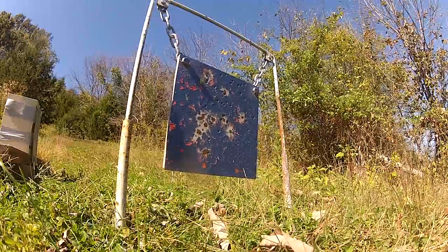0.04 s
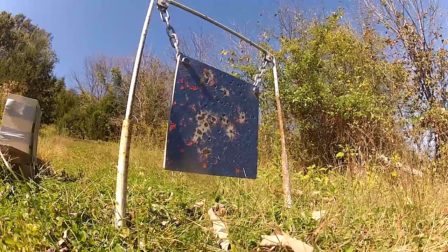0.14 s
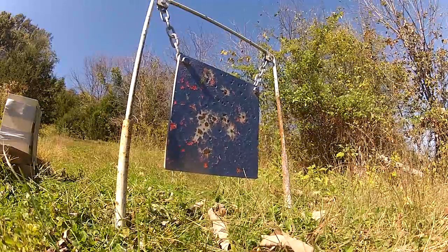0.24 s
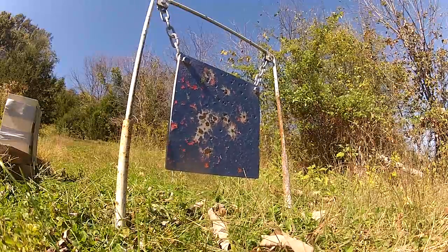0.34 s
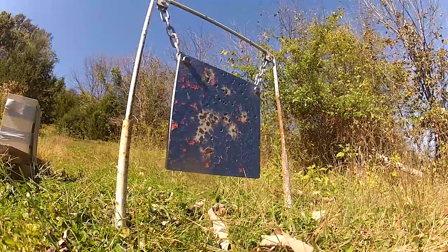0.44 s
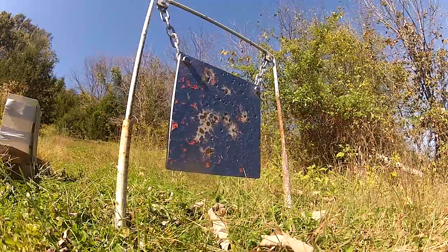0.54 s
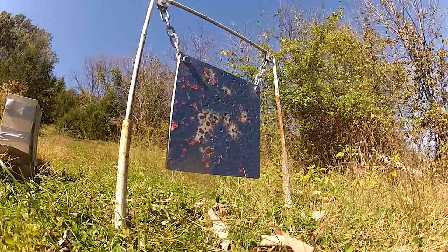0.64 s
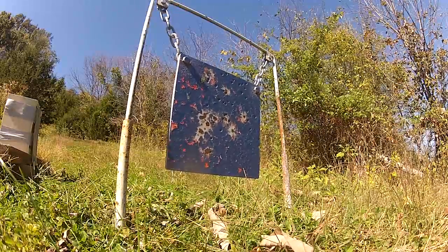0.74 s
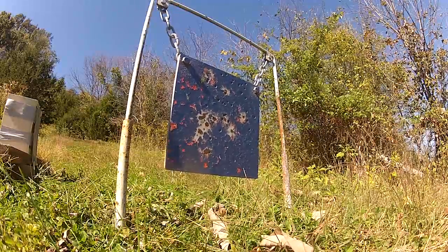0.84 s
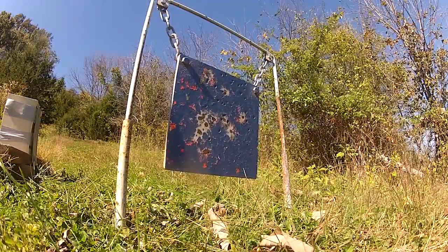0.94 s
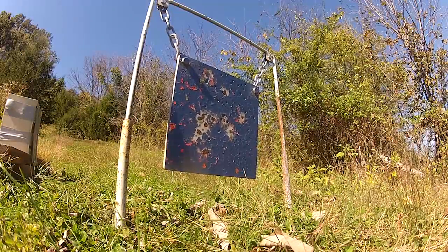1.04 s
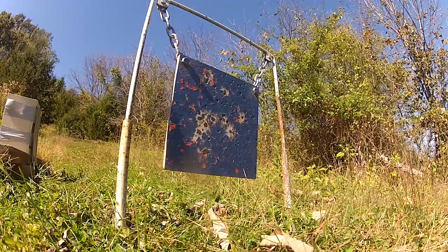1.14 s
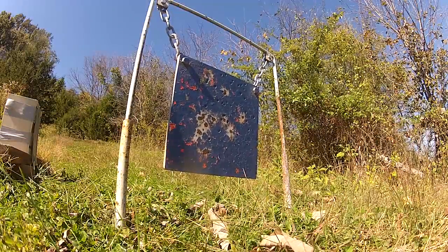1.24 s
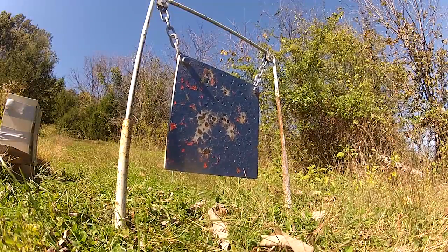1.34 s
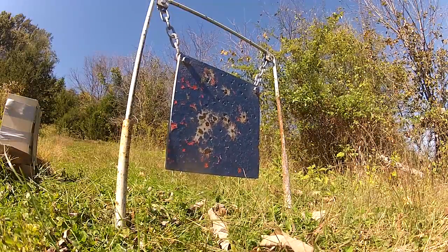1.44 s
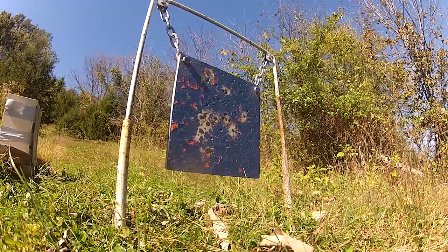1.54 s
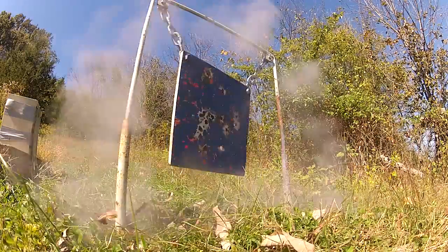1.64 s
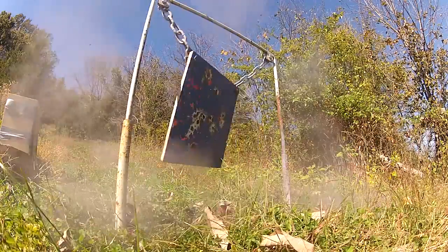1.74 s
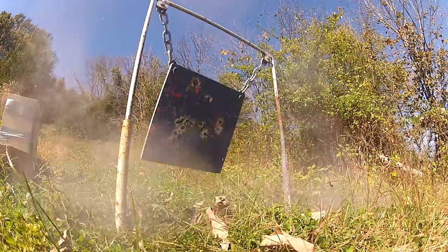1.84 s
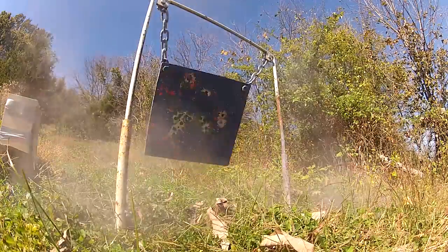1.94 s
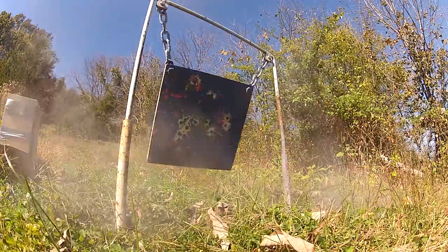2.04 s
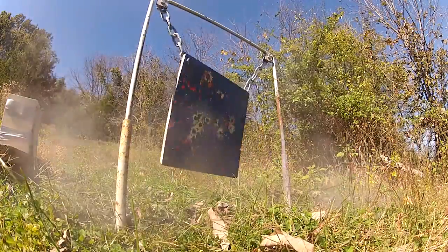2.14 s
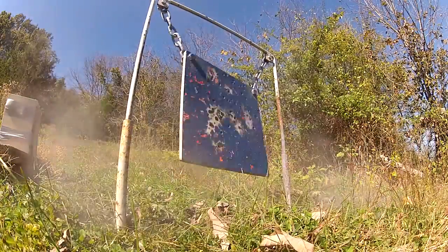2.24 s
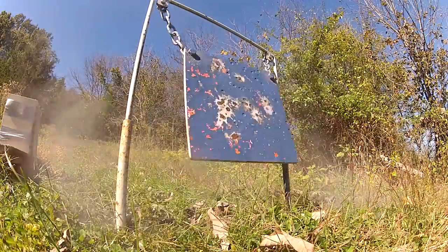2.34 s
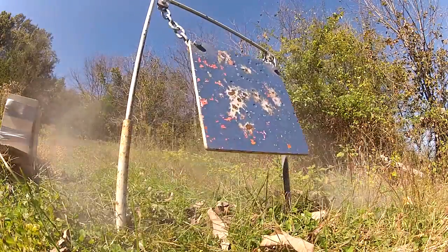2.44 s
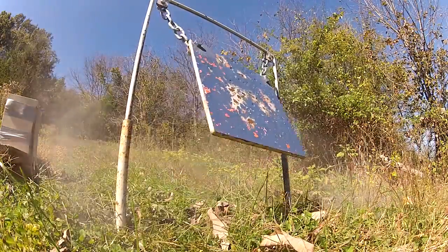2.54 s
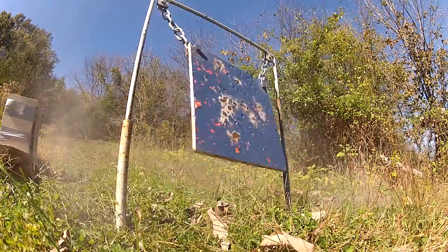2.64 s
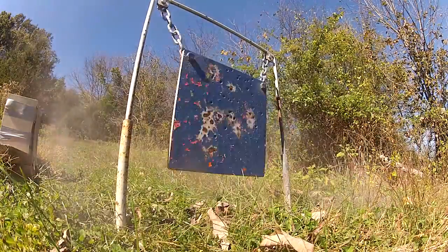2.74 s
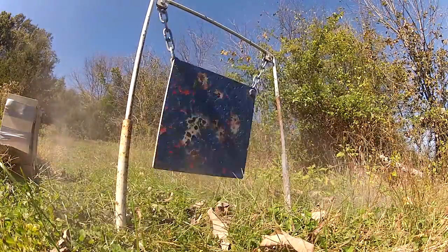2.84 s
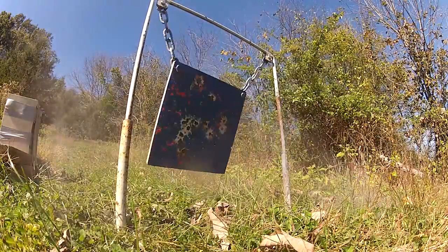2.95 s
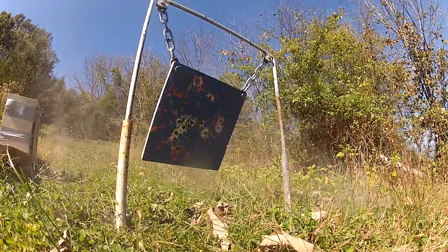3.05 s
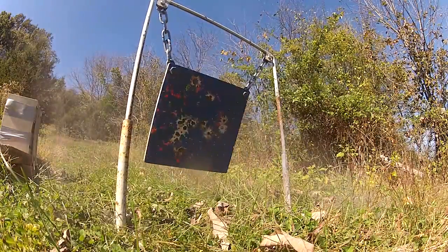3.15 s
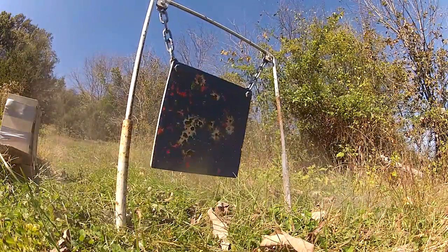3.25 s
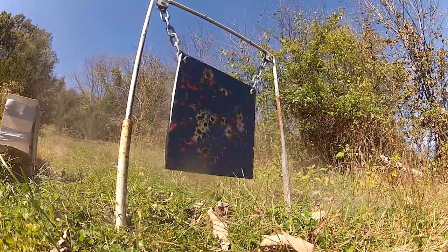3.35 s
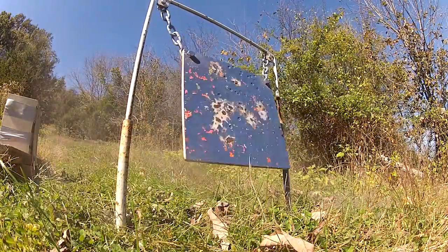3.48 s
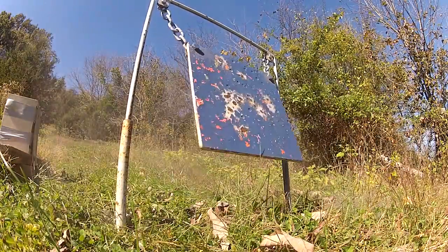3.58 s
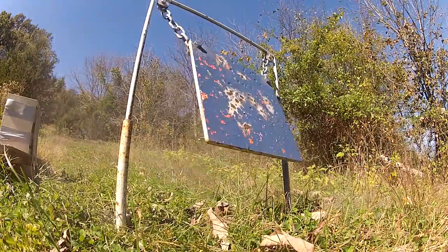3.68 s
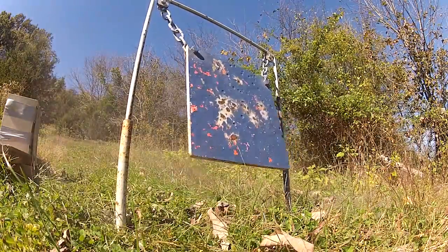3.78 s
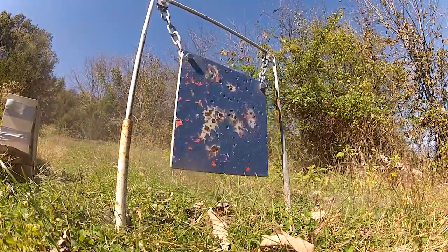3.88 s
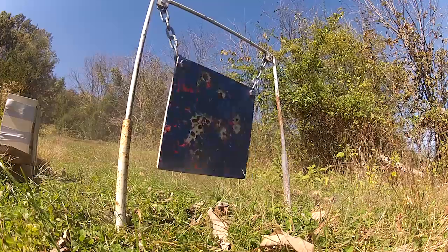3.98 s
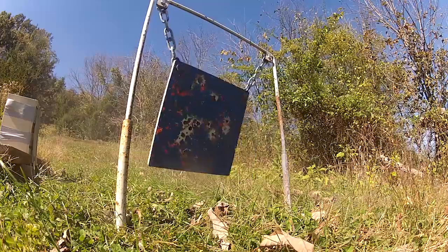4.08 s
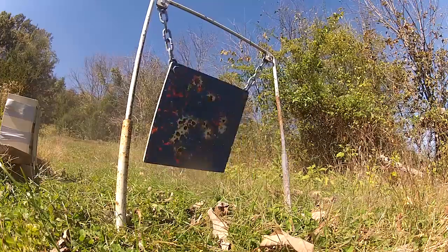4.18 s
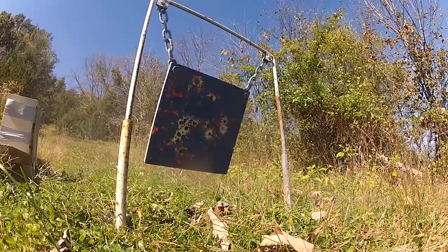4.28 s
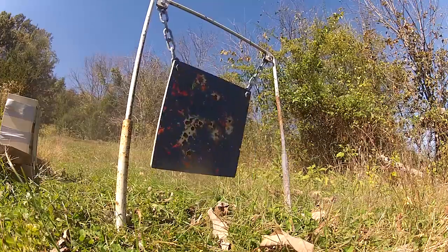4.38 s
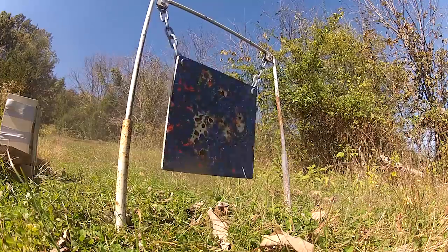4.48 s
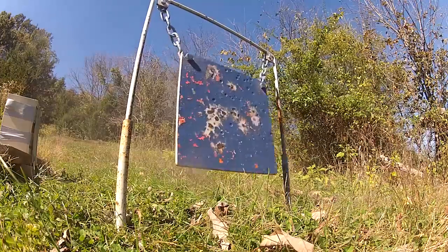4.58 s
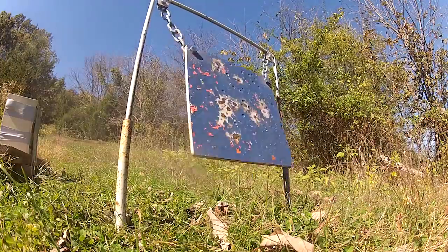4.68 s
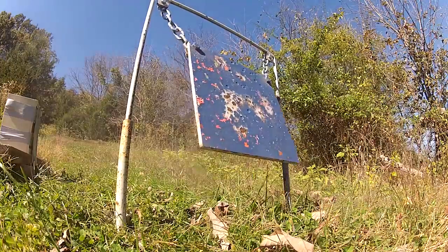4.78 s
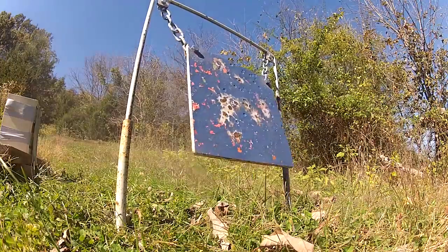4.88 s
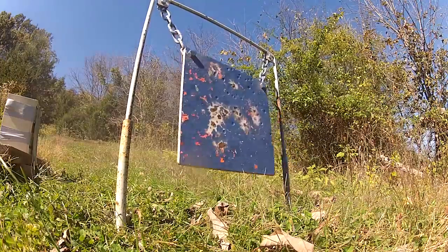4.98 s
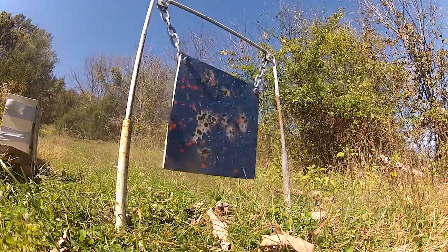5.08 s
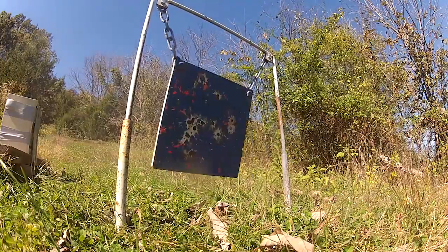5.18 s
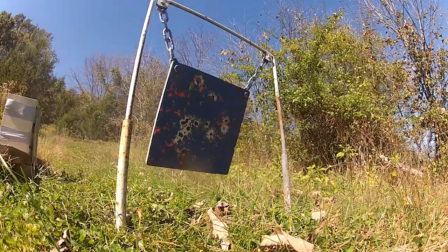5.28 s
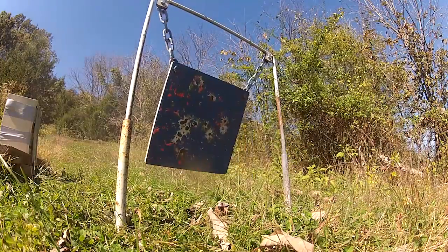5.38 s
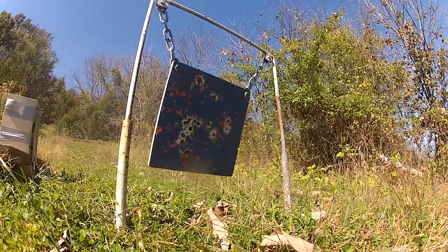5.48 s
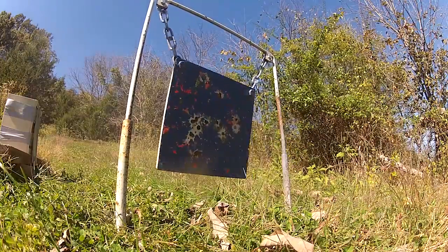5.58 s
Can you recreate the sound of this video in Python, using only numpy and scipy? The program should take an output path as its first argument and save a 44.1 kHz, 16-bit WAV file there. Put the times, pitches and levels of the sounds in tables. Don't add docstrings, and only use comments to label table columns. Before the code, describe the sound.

A bullet smacks a hanging steel plate with a harsh overloaded clang, a dull gunshot echoes off hills, and chains rattle and clink to rest.

```python
import sys
import numpy as np
from scipy import signal
from scipy.fft import rfft, irfft
from scipy.io import wavfile
from scipy.ndimage import uniform_filter1d

SR = 44100
rng = np.random.default_rng(int(sys.argv[2]) if len(sys.argv) > 2 else 0)


def unload_audio(sound):
    columns = np.transpose(np.atleast_2d(sound))
    steps = np.round(np.clip(columns, -1, 1) * 32767)
    wavfile.write(sys.argv[1], SR, steps.astype(np.int16))


def how_loud(loudness_db):
    steps = np.asarray(loudness_db, float) / 20
    return 10 ** steps


N = 247842
T = np.arange(N) / SR

STRIKE_S = 1.7149
# f/Hz, level/dB, t60/s, lobe
# passes t/s, half-width/s
PLATE_MODES = [(370, -45, .17, 1.72, .5), (520, -40, 6.0, 1.92, 0.17), (520, -8, 1.9, 2.25, 0.16),
               (520, -11, 2.2, 2.55, 0.42), (4021, -37, 4.0, 2.2, .26), (4021, -8, .14, 1.72, .075),
               (4021, -28.5, 4.0, 1.905, .065), (4021, -37, 4, 1.83, .05), (4220, -14, .14, 1.72, .11),
               (2973, -32, 4.0, 2.18, .11),
               (603, -44, .47, 1.72, .5), (1577, -30, .6, 1.72, .25), (1771, -42, 3.0, 1.76, .2),
                   (1983, -33, .35, 1.72, .3), (2336, -40, .25, 1.72, .3), (2664, -19, .36, 1.74, .17),
                   (2638, -36, .5, 1.76, .2), (2973, -17.5, 2.5, 1.8, .155), (3108, -38, .4, 1.72, .3),
                   (3338, -34, .5, 1.74, .2), (3823, -33, .6, 1.79, .1), (4958, -47, 1.2, 1.78, .17),
                   (5083, -52, 1.0, 1.8, .17), (5315, -43, 2.0, 1.8, .19), (5987, -38, .4, 1.74, .06),
                   (5990, -56, 2, 1.85, .05)]
# f/Hz, level/dB per Hz
LEAD_SPLASH = [(24, -25), (45, -4.5), (330, -2), (750, -9), (1400, -8), (2400, -7), (2700, -2), (3600, -15),
               (4050, -1.5), (4600, -12.5), (5900, -10.5), (7600, -46)]
# f/Hz, level/dB per Hz
FRAGMENT_SPRAY = [(40, -9), (150, -5), (400, 1.5), (800, -8), (1200, -17.5), (2200, -8), (3500, -13.5),
                  (5800, -16), (7500, -63)]
# t/s, length/s, size
SHOCK_PULSES = [
    (1.7149, .0003, .55),
    (1.7153, .0022, -0.84),
    (1.718, .002, -0.36),
    (1.719, 0.009, 0.21),
    (1.736, .003, -0.18),
    (1.738, .002, 0.098),
]
# f/Hz, level/dB per Hz
HILL_COLOUR = [(18, -43.5), (30, -15), (59, -12), (119, 0.5), (145, 1.5), (271, 2), (450, -10), (500, -11),
               (650, -35.5), (1100, -120)]
# f/Hz, level/dB per Hz
TREE_COLOUR = [(250, -30.5), (400, -6.5), (600, 8), (880, -1.5), (1000, -14), (1300, -35)]
# t/s, level/dB, tree line relative level/dB, rise/s, t60/s
HILL_RETURNS = [(1.755, -43, -19, 0.0092, 0.059), (1.88, -35.5, -31, .012, 0.19),
                (2.0, -35.5, -14, 0.034, 0.82), (2.09, -25, -17, 0.019, 0.93),
                (2.24, -21.5, -15.5, 0.027, 0.53), (2.39, -25.5, -14, 0.018, 0.48),
                (2.62, -35, -13.5, 0.13, 3.35), (3.32, -45, -18, 0.094, 4.3),
                (3.75, -43.5, -17.5, 0.28, 2.25), (4.119, -47, -19, .02, .3), (4.32, -56, -8, .05, 6.5)]
# f/Hz, level/dB, t60/s
FRAME_TUBES = [(517, -14, .5), (575.7, 4.5, 0.12), (612.6, -5, 0.14), (861.5, -26.5, 0.12), (684, -24, .08)]
# f/Hz, level/dB, t60/s
HOOK_TUBE = [(582.3, -1, 0.12), (559.5, -3, 0.092), (535, -14, 0.53), (853, -17.5, 0.124)]
# f/Hz, level/dB, t60/s
LOW_LINK = [(1558, 1.5, 0.11), (1586, -10.5, 0.3), (1860, -3.5, 0.063), (1930, -24, 0.08)]
MID_LINK = [(2619, 4, 0.12), (2350, -9.5, 0.04), (3000, -17, 0.076), (2160, -10.5, 0.02)]
HIGH_LINK = [(3270, -5.5, 0.087), (4044, 1, 0.059), (3762, -15, 0.043), (4880, -20, 0.086),
             (5010, -9.5, 0.11), (5378, -13, 0.073)]
# t/s, level/dB
CHAIN_SHAKE = [
    (1.76, -71),
    (1.83, -50),
    (1.91, -43),
    (1.94, -50.5),
    (2.12, -35.5),
    (2.4, -39.5),
    (2.5, -43),
    (3.15, -68.5),
    (5.6, -81),
]
# t/s, level/dB, t60/s
FRAME_TUGS = [(1.88, -42, .5), (2.078, -22.5, 0.65), (2.13, -16, 0.6), (2.23, -17, 0.22), (2.36, -25, 0.64),
              (2.58, -34.5, 0.69), (2.81, -36, 0.39), (3.1, -39, 0.17), (3.26, -39, .18), (3.739, -49, 1.5),
              (4.18, -50, 0.32), (5.09, -49.5, 1.4)]
# f/Hz, level/dB per Hz
CHAIN_SCRAPE = [(530, -13.5), (900, -8.5), (1180, -17.5), (1550, -0.5), (1690, -4), (2540, 1),
                (3510, -11.5), (3920, -15), (5900, -43), (7670, -71), (13000, -120)]
# f/Hz, level/dB per Hz
FALLING_GRIT = [(900, -36), (1500, -16), (2500, -1), (3200, 1.5), (4200, -0.5), (5200, -7), (5900, -12),
                (7500, -60)]
# t/s, click level/dB, then relative level/dB of hook tube and struck link
LOW_KNOCKS = [(2.0744, -26, 11, -8), (2.2164, -18, 1, -3.5), (2.384, -21.5, 0, -5), (2.4446, -24, -3, -9.5),
              (2.4992, -25, 3.5, -2.5), (2.5294, -28.5, 5, -3.5), (2.5494, -49, 6, -11),
              (2.6047, -38, 8, -5), (2.72, -35, -3, -12), (2.7302, -30.5, -2.5, -13), (2.7629, -43, 0, -10),
              (2.9644, -42, 3, -5), (2.9925, -37, 7.5, -8), (3.1, -47.5, -2, 0), (3.5229, -37, 2, -14),
              (3.7233, -33, -23, -15), (3.8465, -46, -11, -17.5), (3.89, -50, -8, -10),
              (4.1225, -41, 8, -14), (4.5201, -44, 6.5, -9), (4.8854, -50, -1, -5.5),
              (5.0777, -42.5, 12, 3), (5.1574, -39.5, 1, -7.5)]
MID_KNOCKS = [(2.2487, -31.5, 6, -3.5), (2.2992, -31, 10, -12), (2.3486, -29, 2, -12),
              (2.3655, -22, 0, -9.5), (2.3991, -17, -9, -6), (2.7753, -35.5, -3, -13), (2.7926, -38, 1, -4),
              (2.8025, -39, 11, -4), (2.6372, -31, 0, -19), (2.8679, -31.5, -3, -19),
              (3.0315, -35.5, -2.5, -20), (3.5438, -36.5, -19, -1.5), (4.56, -47, 5, -15),
              (4.593, -60, -2, -15), (4.683, -45, -1, -16), (4.6921, -47.5, -1, 3.5),
              (5.0404, -46.5, 0, -16), (5.2816, -50.5, -14.5, -12)]
HIGH_KNOCKS = [(2.0394, -30, 6, -15), (2.1181, -21.5, 0, -5), (2.149, -20.5, 6, -7.5),
               (2.1744, -24, -1, -4), (2.1894, -23.5, -2, -7.5), (2.4708, -35.5, -15, -11.5),
               (2.625, -40, -5, -12.5), (3.052, -46, 14, -6.5), (3.1103, -40, -2, -7),
               (3.2494, -54.5, 19, -11), (3.3523, -49, -7, -13), (3.693, -68, 8, -14),
               (4.1819, -46, 3.5, -15), (4.2043, -45, -8, -2.5), (4.3765, -53, 18.5, -7.5),
               (5.1204, -44.5, 16.5, -14), (5.2044, -53, 8.5, -11)]
LINK_PASSES_DB = [(-1.5, -13, -19.5), (-16, -0.5, -14), (0.5, -11.5, 2)]
# f/Hz, level/dB per Hz
DULL_TICK = [(900, -18), (1300, -6.5), (1800, 0.5), (2800, 1.5), (3600, -8), (5500, -28.5)]
BRIGHT_TICK = [(2000, -26), (3200, -8), (5000, -5), (5800, -14), (7000, -50)]
# f/Hz, level/dB per Hz
MEADOW_AIR = [(12, -30.5), (20, -11), (66, -6.5), (98, -2), (162, -12.5), (192, -4), (216, -13), (243, -10),
              (401, -15), (546, -18.5), (859, -28.5), (2450, -31), (5900, -37.5), (7670, -68.5),
              (13000, -120)]
MEADOW_DB = -55.5
# f/Hz, level/dB per Hz
CHANNEL_HISS = [(18, -33), (30, -2.5), (141, 0), (593, -13), (3710, -12.5), (5280, -13.5), (5900, -30),
                (7670, -61), (13000, -120)]


def noise():
    return rng.standard_normal(N)


def shaped(x, points):
    hz, db = np.transpose(points)
    f = np.maximum(np.arange(len(x) // 2 + 1) * SR / len(x), 1)
    gain = how_loud(np.interp(np.log(f), np.log(hz), db))
    y = irfft(rfft(x) * gain, len(x))
    return y / np.std(y)


def walk(rate):
    k = int(SR / rate)
    steps = np.repeat(rng.standard_normal(N // k + 1), k)
    return 1.4 * uniform_filter1d(uniform_filter1d(steps, k), k)[:N]


def fade(t, t60):
    return (t >= 0) * how_loud(-60 * np.maximum(t, 0) / t60)


def bell(t, width_s):
    return np.exp(-.5 * (t / width_s) ** 2)


def half_wave(t, length_s):
    return np.sin(np.pi * np.clip(t / length_s, 0, 1))


def swells(s, db, rise_s, t60):
    t = T[::64, None] - s
    each = how_loud(db) * np.where(t < 0, bell(np.minimum(t, 0), rise_s), fade(t, t60))
    total = np.sqrt(np.sum(each ** 2, axis=1))
    return (T > STRIKE_S) * np.interp(T, T[::64], total)


def ring(drive, modes, rise_s):
    out = 0
    slide = np.exp(-1 / (rise_s * SR))
    for (hz, db, t60), force in zip(modes, np.broadcast_to(drive, (len(modes), N))):
        turn = np.exp(2j * np.pi * hz / SR)
        poles = np.convolve([1, -turn * slide], [1, -turn * how_loud(-60 / (t60 * SR))])
        out = out + how_loud(db) * (1 - slide) * signal.lfilter([1], poles, force).imag
    return out


def plate():
    near = slice(int(STRIKE_S * SR), int((STRIKE_S + 1.4) * SR))
    t = T[near] - STRIKE_S
    swell = 1 - fade(t, .02)
    modes = PLATE_MODES
    phases = {mode[0]: rng.random() for mode in modes}
    out = np.zeros(N)
    for hz, db, t60, passes, width in modes:
        lobe = np.cos(np.pi / 2 * np.clip((T[near] - passes) / width, -1, 1)) + 0.014
        out[near] += how_loud(db) * swell * fade(t, t60) * lobe * np.sin(2 * np.pi * (hz * t + phases[hz]))
    for pitch, size, phase in rng.random((70, 3)):
        hz = 1400 + 4500 * pitch ** 1.8
        out[near] += how_loud(-55 - 18 * size) * fade(t, .8) * np.sin(2 * np.pi * (hz * t + phase))
    return out


def splash():
    t = T - STRIKE_S
    burst = (t >= 0) / (1 + np.exp(np.minimum((t - .0135) / .0012, 50)))
    lead = shaped(noise(), LEAD_SPLASH) * how_loud(-10.0) * burst
    spray = shaped(noise(), FRAGMENT_SPRAY) * (how_loud(-10) * fade(t, 0.086) + how_loud(-46.5) * fade(t, 2.4))
    return lead + spray


def shock():
    return sum(size * half_wave(T - s, length) for s, length, size in SHOCK_PULSES)


def report():
    t = T - 1.8724
    blast = bell(t, 0.0018) * np.cos(2 * np.pi * 211 * t + 0.96)
    return how_loud(-10) * (blast + 0.063 * half_wave(t - .003, 0.0057))


def echoes():
    s, db, tree_db, rise_s, t60 = np.transpose(HILL_RETURNS)
    hills = shaped(noise(), HILL_COLOUR) * swells(s, db, rise_s, t60) * how_loud(1.5 * walk(45))
    tree_level = swells(s, db + tree_db, rise_s, 1.25 * t60) * how_loud(3.0 + 1.5 * walk(60))
    return hills + shaped(noise(), TREE_COLOUR) * tree_level


def frame_and_chains():
    shake = how_loud(np.interp(T, *np.transpose(CHAIN_SHAKE), left=-120))
    tug_s, tug_db, tug_t60 = np.transpose(FRAME_TUGS)
    shiver = np.hypot(swells(tug_s, tug_db, .03, tug_t60), how_loud(7) * shake)
    hits = rng.random(N) < 400 / SR
    hail = hits * noise() * how_loud(3.4 * rng.exponential(size=N))
    frame = ring(hail + 0.074 * noise(), FRAME_TUBES, rise_s=0.0021)
    links = ring(hail, LOW_LINK + MID_LINK + HIGH_LINK[:1], rise_s=0.0013)
    scrape = shaped(noise() * how_loud(2.8 * walk(150)), CHAIN_SCRAPE)
    rattle = how_loud(-8) * links / np.std(links) + how_loud(-1.0) * scrape
    rattle *= np.clip((T - 1.86) / 0.15, .3, 1)
    return how_loud(-6.5) * shiver * frame / np.std(frame) + shake * rattle


def clinks():
    groups = [LOW_KNOCKS, MID_KNOCKS, HIGH_KNOCKS]
    s, db, hook_db, link_db = np.transpose(sum(groups, []))
    struck = np.repeat(LINK_PASSES_DB, [len(group) for group in groups], axis=0)
    low_db, mid_db, high_db = link_db + struck.T
    at = (s * SR).astype(int)
    bodies = [(HOOK_TUBE, hook_db, -7.0, 0.0026), (LOW_LINK, low_db, -5.0, 0.003),
              (MID_LINK, mid_db, -2.0, 0.0013), (HIGH_LINK, high_db, -4.5, .002)]
    out = np.zeros(N)
    for modes, share_db, trim_db, rise_s in bodies:
        spread_db = 2.2 * rng.standard_normal((len(modes), len(s)))
        drive = np.zeros((len(modes), N))
        drive[:, at] = how_loud(db + share_db + trim_db + spread_db)
        out += ring(drive, modes, rise_s)
    order = np.sort(s)
    since = T - order[np.maximum(np.searchsorted(order, T) - 1, 0)]
    out *= how_loud(-10 / (1 + np.exp(np.clip((0.042 - since) / 0.006, -30, 30))))
    touch = (1 - fade(T[:1200], 0.0018)) * fade(T[:1200], 0.023)
    for colour, tick_db in [(DULL_TICK, db - 8.0), (BRIGHT_TICK, db + high_db - 0.5)]:
        knock = np.zeros(N)
        knock[at] = how_loud(tick_db - 9 * (s < 2.33))
        out += signal.fftconvolve(knock, touch)[:N] * shaped(noise(), colour)
    return out


def grit():
    t = T - 2.15
    patter = shaped(noise(), FALLING_GRIT) * how_loud(2.5 * walk(220))
    return patter * how_loud(-38.5) * bell(t, np.where(t < 0, .06, .09))


def meadow():
    air = shaped(noise(), MEADOW_AIR)
    breeze = signal.sosfiltfilt(signal.butter(2, 300, fs=SR, output="sos"), air)
    gusts = breeze * how_loud(.6 * walk(.8) + 2.2 * walk(14)) + (air - breeze) * how_loud(.6 * walk(9))
    hum_hz = 97 + 4.6 * walk(4)
    hum = how_loud(-11.0 + 2.5 * walk(0.91)) * np.sin(2 * np.pi * np.cumsum(hum_hz) / SR)
    duck_db = -22 * fade(T - STRIKE_S, 1.2)
    return (gusts + hum) * how_loud(MEADOW_DB - 0.17 + duck_db)


def scene():
    mono = plate() + splash() + shock() + report() + echoes()
    mono += frame_and_chains() + clinks() + grit() + meadow()
    deep = signal.sosfilt(signal.butter(2, 80, fs=SR, output="sos"), mono)
    side = how_loud(-47) * mono * walk(400) - how_loud(-29) * deep
    side += how_loud(MEADOW_DB - 24) * shaped(noise(), CHANNEL_HISS)
    return np.array([mono + side, mono - side])


def top_cut(x):
    return signal.sosfilt(signal.butter(12, 16490, fs=SR, output="sos"), x)


def record(dry):
    coarse = signal.resample_poly(dry, 40, 147, axis=1)
    loud = np.clip(coarse, -.72, .72)
    held = np.repeat(loud, 4, axis=1)
    played = signal.resample_poly(held, 147, 160, axis=1)[:, :N]
    low_pass = signal.cheby2(14, 30, 15600, fs=SR, output="sos")
    return top_cut(signal.sosfiltfilt(low_pass, played))


dry = scene()
out = record(dry)
unload_audio(out)
```